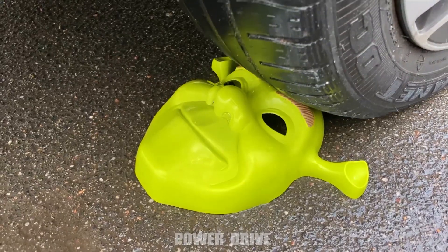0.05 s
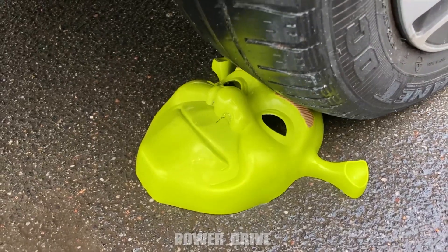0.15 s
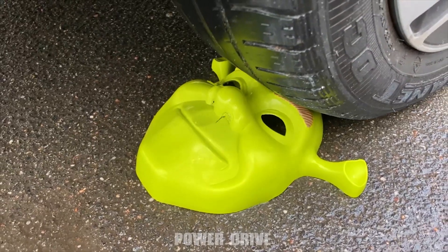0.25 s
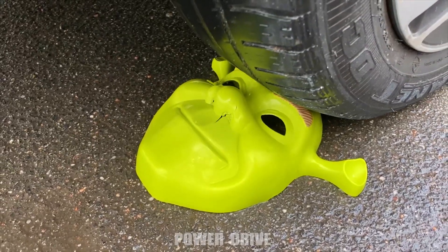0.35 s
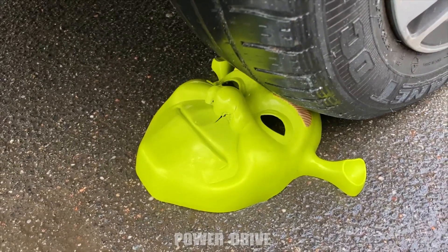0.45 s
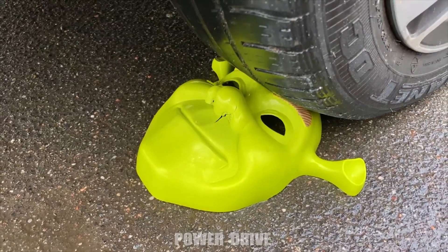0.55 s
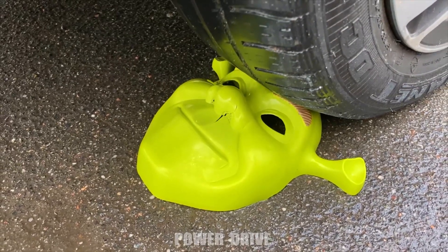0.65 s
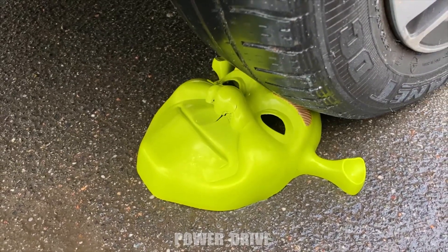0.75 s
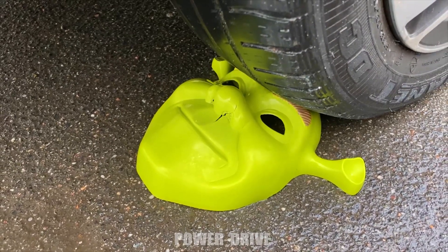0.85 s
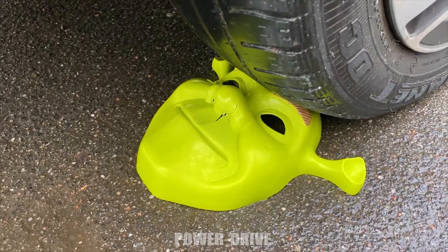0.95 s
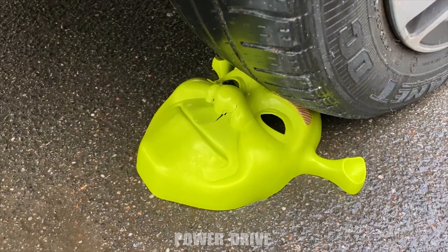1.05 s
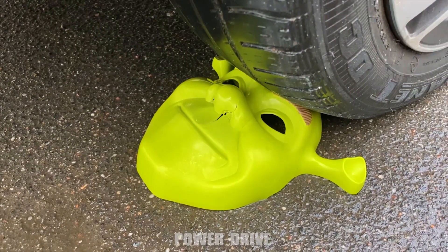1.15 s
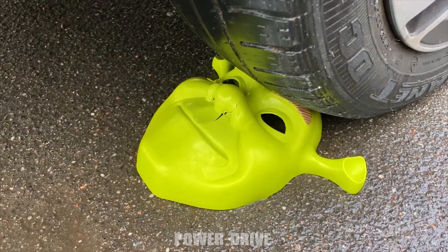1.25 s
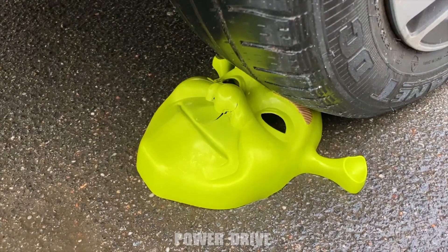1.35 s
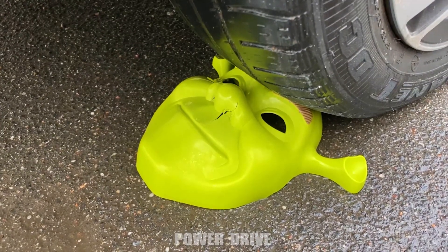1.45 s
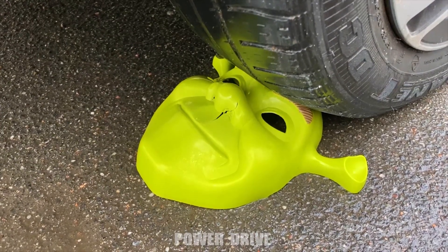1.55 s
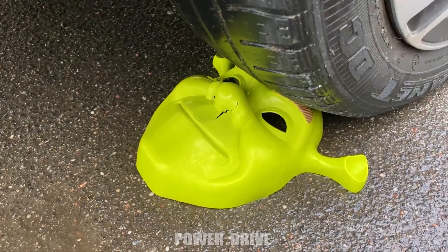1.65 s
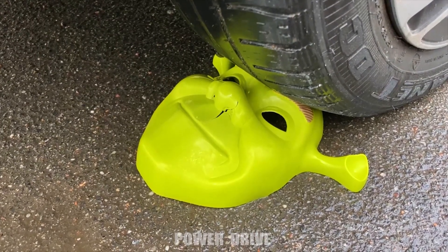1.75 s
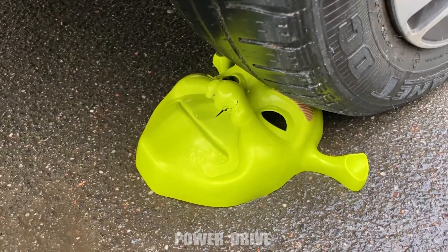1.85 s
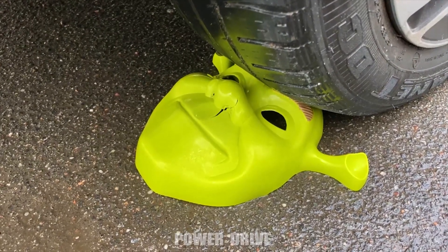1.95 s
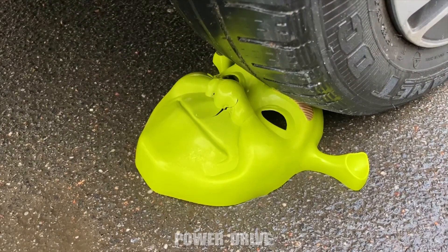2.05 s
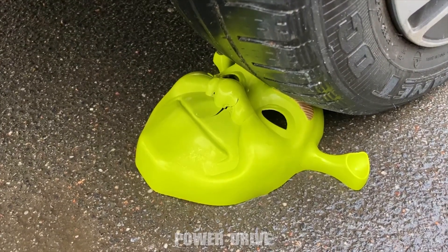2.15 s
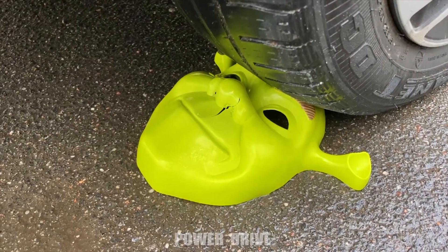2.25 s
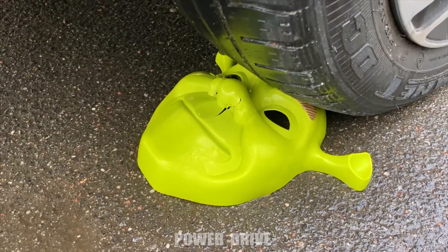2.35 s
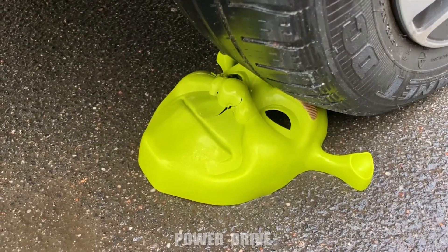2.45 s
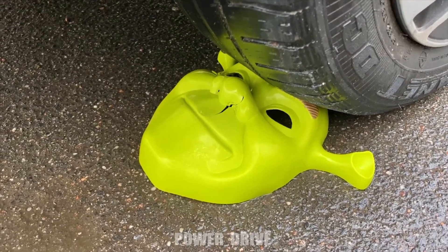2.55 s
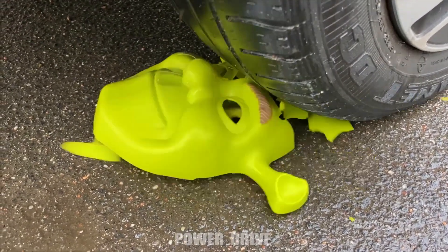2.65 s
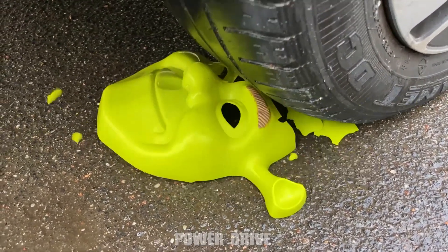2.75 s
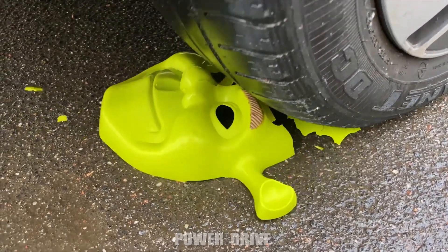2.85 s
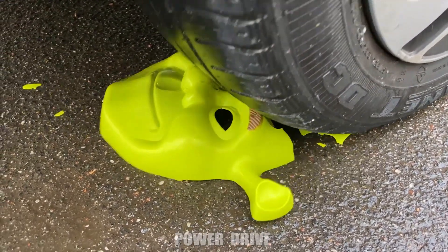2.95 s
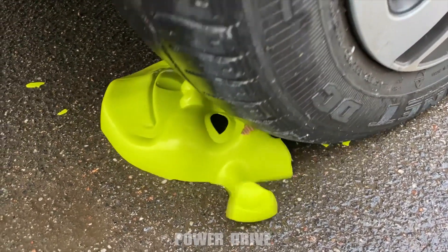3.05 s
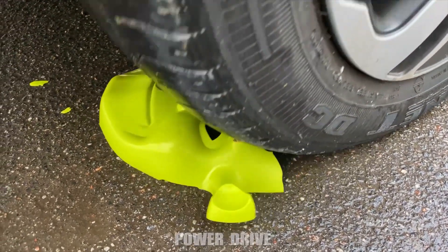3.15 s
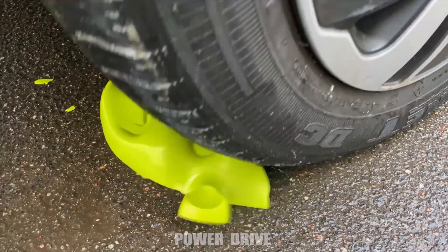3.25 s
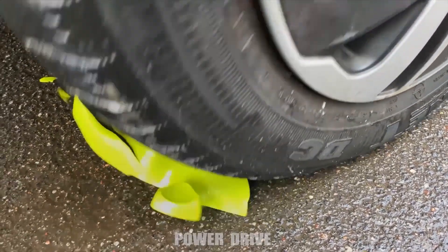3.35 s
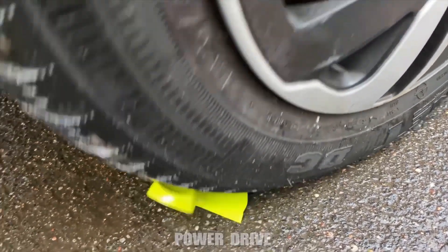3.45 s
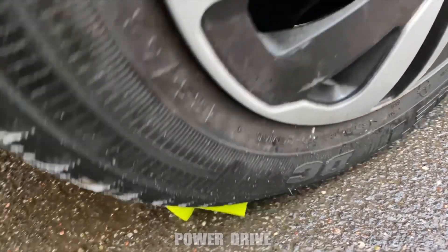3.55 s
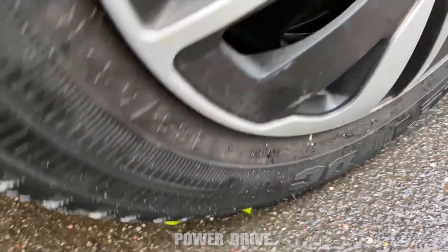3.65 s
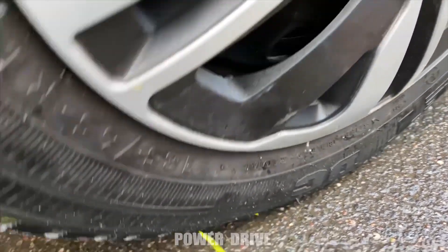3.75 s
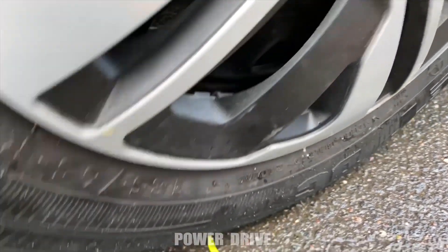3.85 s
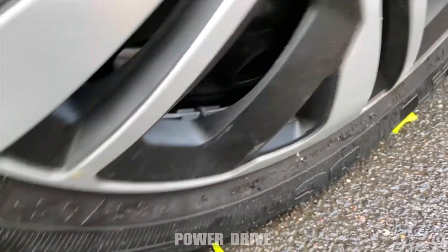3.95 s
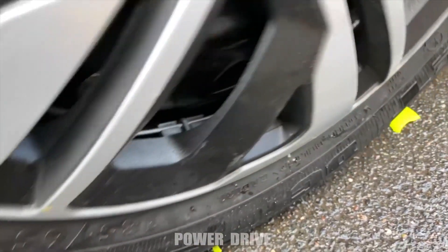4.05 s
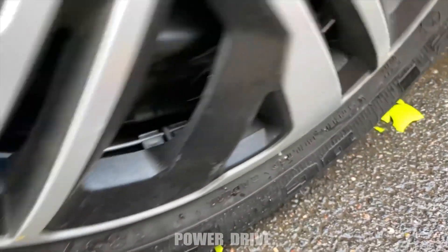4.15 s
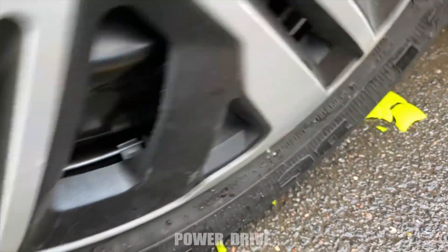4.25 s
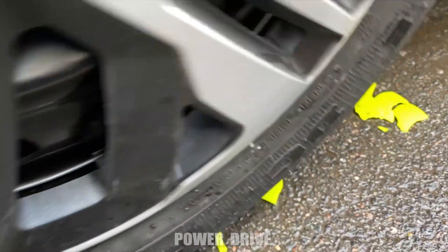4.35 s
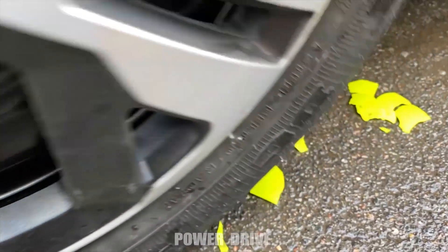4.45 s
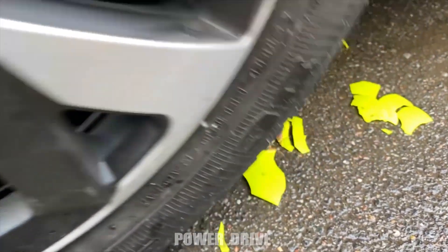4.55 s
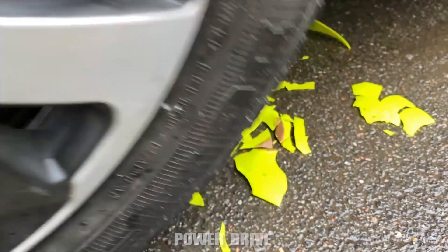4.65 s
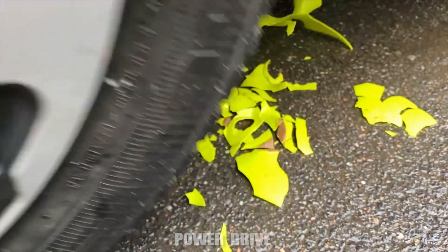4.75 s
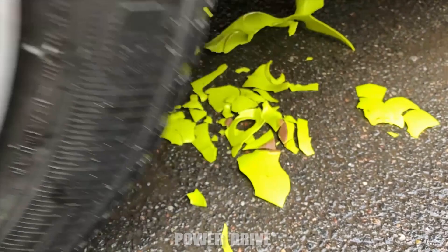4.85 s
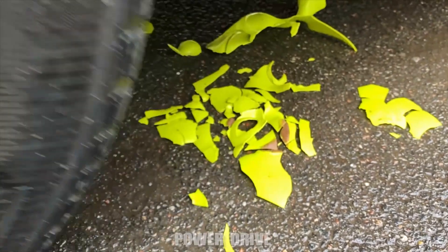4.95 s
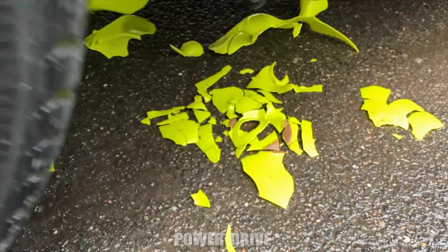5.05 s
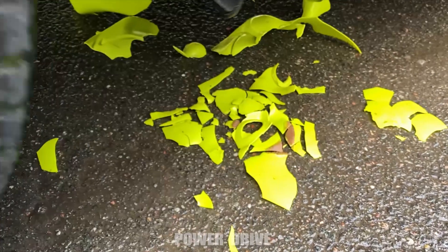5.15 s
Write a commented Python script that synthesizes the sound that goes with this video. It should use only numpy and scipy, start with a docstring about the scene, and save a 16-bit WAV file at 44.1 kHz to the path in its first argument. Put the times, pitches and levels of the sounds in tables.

```python
"""Sharp plastic cracks, a loud crunch, then soft grinding, over the throb of an idling engine.
A car is creeping over a hard plastic mask on asphalt, close to a small microphone.
The shell gives a few single cracks, caves in with a puff of air and splinters; then the tyre grinds
the shards. The cracks echo under the car and overload the microphone, which the puffs of air press
against its limit. A steady hiss lies behind it all."""
import sys
import numpy as np
from scipy import signal
from scipy.fft import rfft, irfft, next_fast_len
from scipy.io import wavfile
from scipy.ndimage import uniform_filter1d

SR = 44100
rng = np.random.default_rng(int(sys.argv[2]) if len(sys.argv) > 2 else 0)


def dump(signal):
    """Clip the signal to [-1, 1] and save it as 16-bit WAV at the path in sys.argv[1]."""
    limited = np.clip(np.atleast_2d(signal).T, -1, 1)
    pcm = np.round(limited * 32767).astype(np.int16)
    wavfile.write(sys.argv[1], SR, pcm)


N = 229481
T = np.arange(N) / SR  # the time of every sample, in seconds
CAVE_IN_S = 2.6  # the shell is whole until here
PUFF_RISE_S = 0.0084

# Levels are in decibels (db): lower is quieter. A fade_s is the time a sound takes to drop by 60 db.
# Each crack, and the note of the piece that breaks:
# start_s, force_db, fade_s, bass_db, treble_db, piece_hz, piece_boost_db
SHELL_CRACKS = [ (0.1814, 1.5, 0.052, 3, -1.5, 720, 10), (0.3329, 2.5, 0.065, 1, 0, 6180, 12.5),
                (0.4149, 1, 0.078, 1, -0.5, 540, 14), (1.638, 1.5, 0.026, -11, 1, 3280, 5.5),
                (2.5415, -.5, 0.032, -1, -1.5, 10900, 6.5), (2.658, 10.5, .048, -3, -2, 132, 21),
                (2.6814, 10.5, 0.032, 5, 2.5, 149, 17), (2.732, -19, 0.067, -10, -1.5, 1570, 7),
                (2.865, -2.5, 0.08, -4.5, -10, 2770, 4), (2.8733, 5, 0.058, 1, -9, 1100, 3.5),
                (2.9197, -9.5, 0.028, -11, -17, 2130, 4), (3.0196, -5, 0.049, -12, -6.5, 1586, 17),
                (3.0303, 0, 0.087, -1, -8, 786, 21.5), (3.041, -2, 0.059, 5, -1, 836, 4),
                (3.06, -2.5, 0.098, 5.5, 0.5, 5100, 7), (3.087, 0, 0.029, 1, 4, 6800, 5),
                (3.101, -14, 0.066, 9.5, -6, 3600, 10), (3.132, -7, 0.045, 5, -9, 3690, 15),
                (3.1458, 0.5, 0.035, 4, 17, 7100, 6), (3.159, -10.5, .029, 10, 1, 7400, 21),
                (3.1942, -13.5, 0.046, 7, -8, 1604, 8), (3.207, -11.5, 0.032, 3, 5, 1720, 16),
                (3.2239, -11, 0.036, 14, -1, 1530, 3), (3.2436, -18, 0.13, 7, -11, 1180, 3),
                (3.277, -2.5, 0.038, 3, -3.5, 1460, 11.5), (3.328, -3, 0.052, 2.5, 4, 1100, 3),
                (3.349, 2.5, 0.11, -1, -3, 3300, 4), (3.406, 1, 0.021, -21, -3.5, 2155, 11.5),
                (3.4396, 1.5, 0.047, -1, 1, 2630, 1), (3.4628, -7.5, 0.099, 6.5, 9, 8450, 4.5),
                (3.5865, -13, 0.042, -18, -2.5, 2530, 15.5), (4.5614, -5.5, 0.015, -24, -7, 4970, 8.5)]
# The bright tone of the plastic: pitch_hz, level_db
SHELL_TONE = [(100, -6), (250, -8), (400, -5.5), (600, -3), (1000, 1), (1500, -3), (2300, -0.5), (4000, -1),
              (7000, 3), (9200, -3), (11500, 1.5), (14000, -4.5), (16000, -16.5)]
# The open shell folds and splinters: start_s, length_s, level_db
SHELL_FOLDS = [(2.73, 0.13, -29), (3.01, 0.46, -28.5)]
# The muffled tone of shards under the tyre: pitch_hz, level_db
SHARD_TONE = [(300, -30), (600, -13), (1200, -5.5), (2400, 2), (3300, -3.5), (4700, -9), (7000, -8.5),
              (11600, -13), (15000, -20)]
# Heaps of shards crunch: start_s, length_s, level_db
SHARD_CRUNCHES = [(3.712, 0.035, -34.5), (4.006, 0.043, -39), (4.08, 0.021, -42), (4.28, 0.018, -45.5)]
# Single shards snap: start_s, level_db, treble_db
SHARD_SNAPS = [(3.714, -23.5, 16), (3.734, -35, -1), (3.759, -26, -6), (3.798, -29.5, 3),
               (3.878, -30.5, 17), (4.091, -32, -25), (4.134, -37, -8), (4.218, -30.5, 6), (4.25, -27, -28),
               (4.286, -22, -11), (4.3366, -25, -4), (4.365, -24.5, -4), (4.3706, -26, 1),
               (4.403, -25.5, -2.5), (4.453, -27, -1), (4.511, -26.5, -5), (4.879, -36.5, 17)]
# Air squeezed out of the shell: start_s, length_s, pressure (1 = microphone's limit), swing_back_s
AIR_PUFFS = [(2.655, 0.087, 2.6, .23), (3.345, 0.064, 1.6, .07)]
# The engine idles, then revs to climb the shell: time_s, firings_per_s
ENGINE_SPEED = [(0, 21.4), (2.2, 23.1), (2.5, 23.2), (2.72, 35), (2.87, 28), (3.08, 28), (3.6, 22.2),
                (5.2, 21.1)]
# The engine's notes: multiple (of the firing rate), level_db
ENGINE_NOTES = [(1, -24.5), (2, -54), (3, -50.5), (4, -50.5), (5, -50), (7, -52.5), (10, -55), (15, -54.5)]
# The tone of the engine's roar: pitch_hz, level_db
ROAR_TONE = [(10, -26.5), (30, -6), (60, -13), (130, -22.5), (200, -23), (330, -27.5), (450, -32),
             (630, -31), (1000, -37), (2800, -46), (6000, -51.5), (16000, -80)]
# Echoes off the wheel and the car's floor: delay_s, level_db
CAR_ECHOES = [(.0058, -25.5), (0.0132, -15.5), (0.016, -17.5)]
# How long sound lingers under the car: pitch_hz, fade_s
CAR_FADES = [(200, 0.076), (600, 0.11), (2500, 0.14), (7000, 0.11), (15000, 0.073)]
# The tone of the steady hiss: pitch_hz, level_db
HISS_TONE = [(1000, -8.5), (3000, -7.5), (4500, -2), (5700, 2), (6500, 1.5), (7500, 2), (9000, -4),
             (10500, 2), (12300, -0.5), (13300, -5.5), (16000, -16)]
# The level dips briefly: start_s, length_s
LEVEL_DIPS = [(2.711, .02), (3.451, .0115)]


def cracks(uneven_db=2.5, spacing_hz=170, fold_hz=1570, fold_db=6.5):
    """Each break rings the shell at many pitches. The breaking piece stands out, later the fold too."""
    out, t = np.zeros(N), np.arange(SR // 8) / SR
    hz = np.fft.rfftfreq(len(t), 1 / SR)
    for start_s, force_db, fade_s, bass_db, treble_db, piece_hz, piece_boost_db in SHELL_CRACKS:
        bumps_db = uneven_db * np.interp(hz, spacing_hz * np.arange(len(hz)), noise(len(hz)))
        tilt_db = value_at([(800, bass_db), (2800, 0), (8000, treble_db)], hz)
        spectrum = gain(value_at(SHELL_TONE, hz) + tilt_db + bumps_db)
        for peak_hz, boost_db in [(piece_hz, piece_boost_db), (fold_hz, fold_db * (start_s > CAVE_IN_S))]:
            width_hz = 28 + 0.034 * peak_hz
            spectrum *= 1 + (gain(boost_db) - 1) / (1 + ((hz - peak_hz) / width_hz) ** 2)
        random_phases = np.exp(2j * np.pi * rng.random(len(hz)))
        ring = normalise(irfft(spectrum * random_phases, len(t)))
        add(out, start_s, gain(force_db) * ring * fade(t, fade_s))
    return out


def dome_knocks(pitch_hz=528, relative_db=-15):
    """While the mask is still whole, each crack also knocks its hollow dome."""
    out, t = np.zeros(N), np.arange(SR // 6) / SR
    note = np.sqrt(2) * np.sin(2 * np.pi * pitch_hz * t)
    for start_s, force_db, fade_s, *_ in SHELL_CRACKS:
        if start_s < CAVE_IN_S:
            add(out, start_s, gain(force_db + relative_db) * note * fade(t, 0.9 * fade_s))
    return out


def splinters():
    """Hairline breaks crackle between the big cracks while the shell folds."""
    crackle = shape_tone(tiny_breaks(per_s=520, spread_db=3, fade_s=0.03), SHELL_TONE)
    crackle = shape_tone(crackle, [(400, 0.5), (1600, 2.5), (9000, -3)])
    folding = sum(gain(level_db) * swell(start_s, length_s, rise_s=0.022, fade_s=0.69)
                  for start_s, length_s, level_db in SHELL_FOLDS)
    return normalise(crackle) * folding


def shards(grind_start_s=3.5, grind_length_s=1.0, grind_db=-44.5):
    """Flattened pieces grind and snap between rubber and asphalt, which muffles them."""
    crunches = [(grind_start_s, grind_length_s, grind_db), *SHARD_CRUNCHES]
    grinding = sum(gain(level_db) * swell(start_s, length_s, rise_s=0.019, fade_s=0.078)
                   for start_s, length_s, level_db in crunches)
    grit = tiny_breaks(per_s=850, spread_db=6, fade_s=0.029)
    out = grinding * normalise(shape_tone(grit, SHARD_TONE))
    t = np.arange(SR // 10) / SR
    soft_start = np.minimum(t / 0.0011, 1)  # the rubber softens each snap
    for start_s, level_db, treble_db in SHARD_SNAPS:
        snap = shape_tone(noise(len(t)), SHARD_TONE)
        snap = shape_tone(snap, [(1000, -treble_db / 2), (2400, 0), (9000, treble_db)])
        add(out, start_s, gain(level_db) * normalise(snap) * soft_start * fade(t, fade_s=0.039))
    return out


def puffs(fall_s=0.042, swing_share=0.28):
    """Each puff of air presses the microphone one way; it then swings back, slower and weaker."""
    out = np.zeros(N)
    for start_s, length_s, pressure, swing_back_s in AIR_PUFFS:
        t = T - start_s
        push = np.clip(np.minimum(t / PUFF_RISE_S, (length_s - t) / fall_s), 0, 1)
        swing_back = np.sin(np.pi * np.clip((t - length_s) / swing_back_s, 0, 1))
        out += pressure * (swing_share * swing_back - push)
    return out


def tyre(hum_start_s=2.73, hum_hz=232, hum_db=-31, thud_db=-33, roll_db=-35.5):
    """The wheel drops and the air inside hums; the rubber thuds at each puff and rumbles over the wreck."""
    t = np.maximum(T - hum_start_s, 0)
    hum = gain(hum_db) * np.sin(2 * np.pi * hum_hz * t) * fade(t, fade_s=1.3)
    rumble = shape_tone(noise(N), [(15, -24), (35, 6.5), (70, 0.5), (110, -8), (200, -21), (600, -47)])
    thuds = sum(pressure * swell(start_s, 0, PUFF_RISE_S, fade_s=0.28)
                for start_s, _, pressure, _ in AIR_PUFFS)
    rolling = swell(CAVE_IN_S, length_s=1.8, rise_s=0.086, fade_s=0.64)
    return hum + (gain(thud_db) * thuds + gain(roll_db) * rolling) * normalise(rumble)


def engine(idle_hz=23.4, idle_roar_db=-35.5, roar_db_per_hz=0.47):
    """The firings make throbbing notes over a low roar that grows as the engine speeds up."""
    out, firing_hz = np.zeros(N), np.interp(T, *np.transpose(ENGINE_SPEED))
    firings_so_far = np.cumsum(firing_hz * wobble(0.02503)) / SR
    for multiple, level_db in ENGINE_NOTES:
        depth = min(0.11 + 0.16 * (multiple - 1), 1)  # higher notes are less steady
        loudness = gain(level_db) * np.sqrt(2) * normalise(wobble(depth))
        out += loudness * np.sin(2 * np.pi * (multiple * firings_so_far + rng.random()))
    roar = gain(idle_roar_db) * normalise(shape_tone(noise(N), ROAR_TONE))
    low_roar = shape_tone(roar, [(200, -3.5), (900, -46)])
    revving = gain(roar_db_per_hz * (firing_hz - idle_hz)) - 1
    return out + roar + low_roar * revving


def under_car(sound, tail_db=-12, build_s=0.0071):
    """Sound bounces between road and car, adding a few hard echoes and a short fading tail."""
    t = np.arange(SR // 3) / SR
    hz, frame_s, bands = signal.stft(noise(len(t)), SR, nperseg=256)
    bands *= fade(frame_s, value_at(CAR_FADES, hz)[:, None])  # each pitch fades at its own pace
    tail = signal.istft(bands, SR, nperseg=256)[1][:len(t)]
    tail *= 1 - np.exp(-(t / build_s) ** 2)
    echoes = gain(tail_db) * tail / np.linalg.norm(tail)
    for delay_s, level_db in CAR_ECHOES:
        add(echoes, delay_s, gain([level_db]))
    return sound + signal.fftconvolve(sound, echoes)[:N]


def hiss(level_db=-46):
    """The steady high hiss behind everything."""
    return gain(level_db) * normalise(shape_tone(noise(N), HISS_TONE))


def tiny_breaks(per_s, spread_db, fade_s):
    """Tiny breaks at random moments, a few large and many small, each a short burst of noise."""
    sizes = gain(spread_db * np.minimum(rng.exponential(1, N), 4))
    breaks = sizes * (rng.random(N) < per_s / SR)
    power = signal.lfilter([1], [1, -gain(-120 / (fade_s * SR))], breaks ** 2)  # each one dies away
    return np.sqrt(power) * noise(N)


def swell(start_s, length_s, rise_s, fade_s):
    """A loudness curve that rises, holds and dies away."""
    rise = np.clip((T - start_s) / rise_s, 0, 1)
    return rise * fade(np.maximum(T - start_s - length_s, 0), fade_s)


def fade(t, fade_s):
    """Falls from 1 to a thousandth in fade_s."""
    return np.exp(-np.log(1000) * t / fade_s)


def wobble(depth):
    """Drifts around 1, heading for a new random value 20 times a second."""
    times_s = np.arange(0, T[-1] + 1, 1 / 20)
    return 1 + depth * np.interp(T, times_s, noise(len(times_s)))


def noise(count):
    """Random values: white noise."""
    return rng.standard_normal(count)


def gain(db):
    """Turns decibels into a number to multiply by."""
    return 10 ** (np.asarray(db) / 20)


def normalise(sound):
    """Sets the average strength (root mean square) to 1."""
    return sound / np.sqrt(np.mean(sound ** 2) + 1e-20)


def value_at(table, hz):
    """Reads between the rows of a (pitch_hz, value) table, with octaves evenly spaced."""
    pitch_hz, values = np.transpose(table)
    return np.interp(np.log(hz + 1), np.log(pitch_hz + 1), values)


def shape_tone(sound, tone):
    """Turns pitches up or down by a (pitch_hz, level_db) table."""
    size = next_fast_len(len(sound), True)
    gains = gain(value_at(tone, np.fft.rfftfreq(size, 1 / SR)))
    return irfft(rfft(sound, size) * gains, size)[:len(sound)]


def add(mix, start_s, sound):
    """Mixes a sound in at start_s."""
    part = mix[round(start_s * SR):][:len(sound)]
    part += sound[:len(part)]


def scene():
    """Breaking plastic under the car, with tyre, engine and hiss, in one channel."""
    plastic = cracks() + dome_knocks() + splinters() + shards()
    return (under_car(plastic) + tyre() + engine() + hiss())[None]


def record(dry, limit=0.54, dip_db=-22.5, highest_hz=16000):
    """The level dips twice, the microphone squashes loud peaks, and the very top treble is cut."""
    dips = sum(1.0 * (T > start_s) * (T < start_s + length_s) for start_s, length_s in LEVEL_DIPS)
    dipped = dry * gain(dip_db * uniform_filter1d(dips, size=44))  # with smoothed edges
    squashed = limit * np.tanh(dipped / limit + puffs())  # each puff makes the overload lopsided
    treble_cut = signal.firwin(255, highest_hz, window=("kaiser", 8), fs=SR)
    return signal.oaconvolve(squashed, treble_cut[None], "same")


dry = scene()
out = record(dry)
dump(out)
```